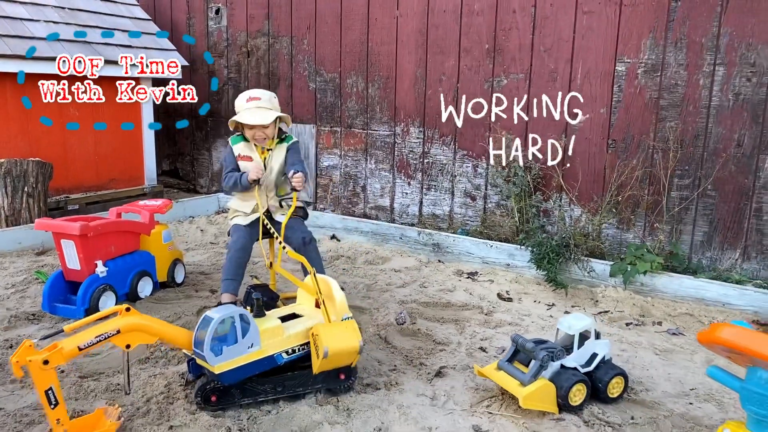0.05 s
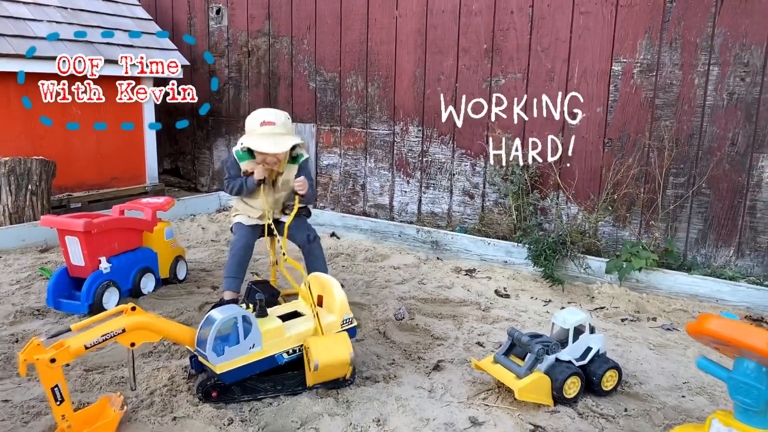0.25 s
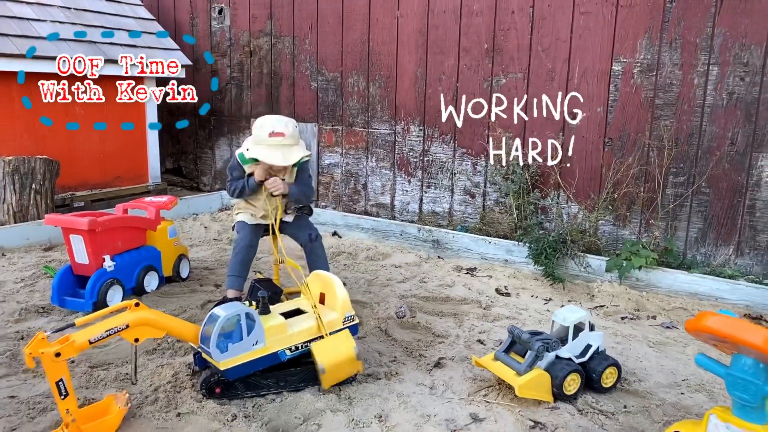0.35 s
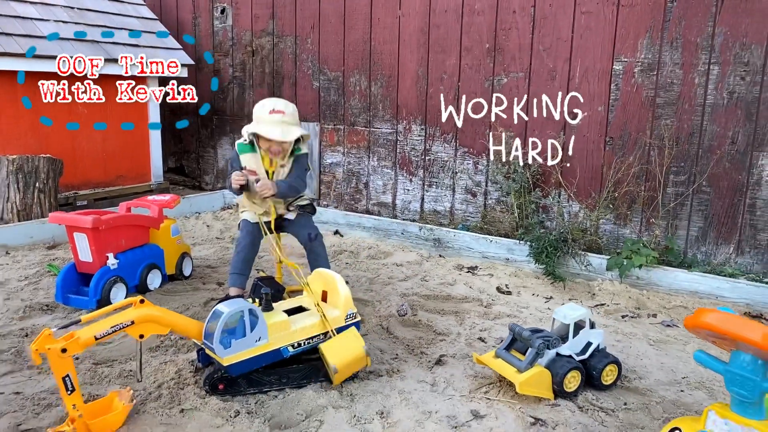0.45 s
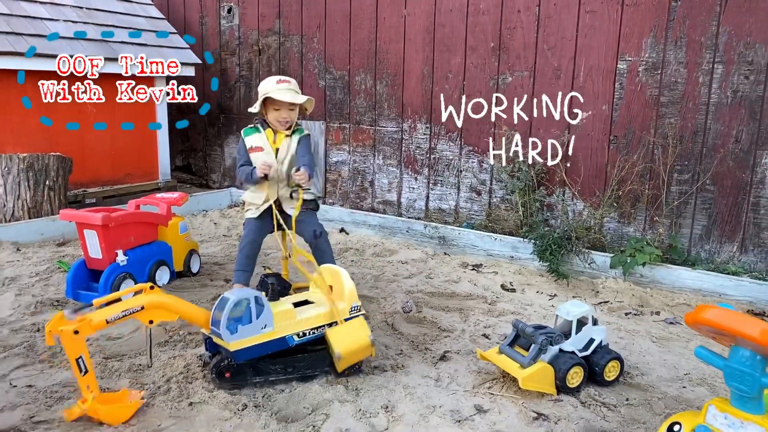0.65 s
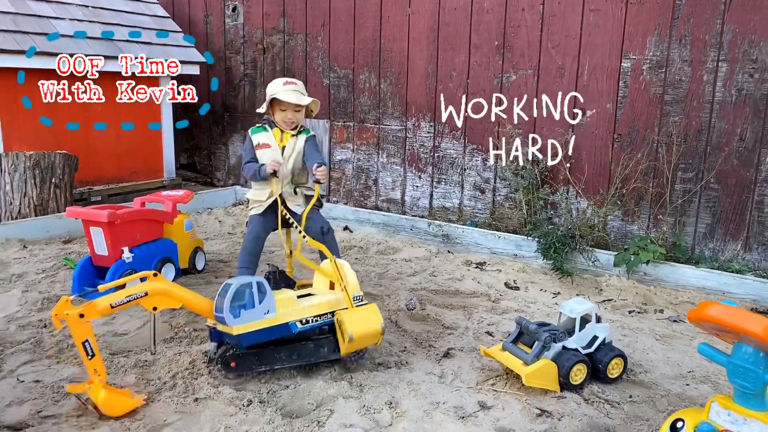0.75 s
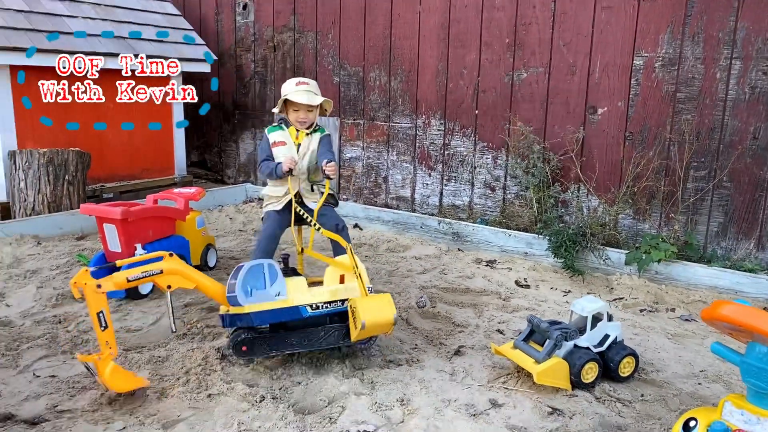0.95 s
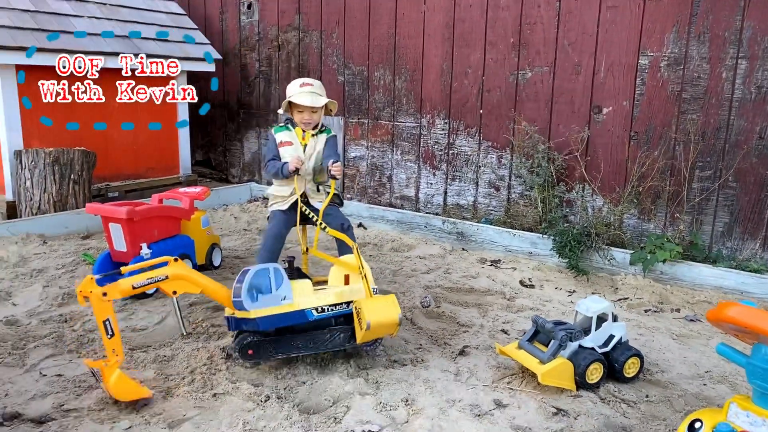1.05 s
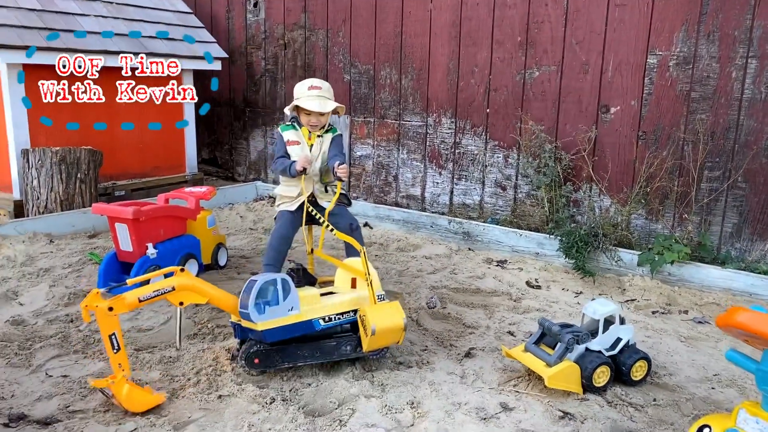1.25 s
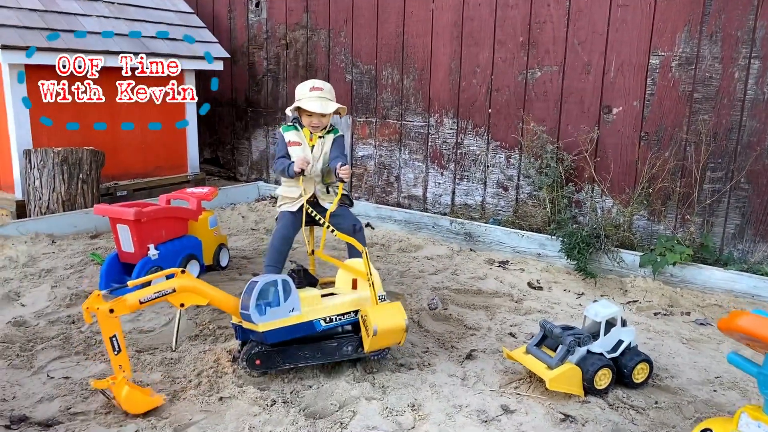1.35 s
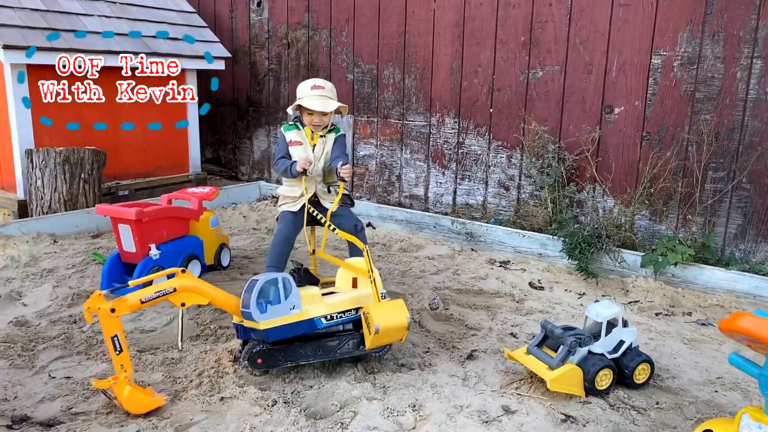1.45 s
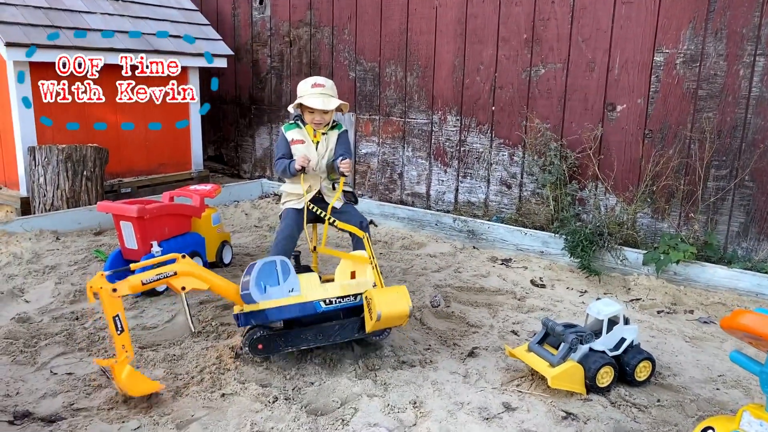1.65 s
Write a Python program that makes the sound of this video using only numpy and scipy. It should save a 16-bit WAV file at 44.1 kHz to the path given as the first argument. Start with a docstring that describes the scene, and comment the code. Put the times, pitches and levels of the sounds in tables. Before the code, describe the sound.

A ride-on toy digger clatters outdoors: a quick run of loose clacks, hollow knocks and gritty scrapes, one loudest double clank, then sparse light ticks and a tiny squeak over low wind, close single microphone.

```python
"""Ride-on toy digger in a sandbox

A child-size digger is worked by its hand levers beside a wooden fence, heard by one microphone under low wind.
Loose joints clack as noise bursts on a plastic shell and ringing steel modes; the seat rumbles as it swivels.
Gritty pivots scrape as trains of random slips, and the hollow body knocks as short swelling sines.
Lighter rattles follow, with two brief squeaks of wavering pitch and one steel ping.
A few dull echoes and a faint tail place the digger in a yard."""
import sys
import numpy as np
from scipy import signal
from scipy.fft import rfft, irfft
from scipy.io import wavfile
from scipy.ndimage import uniform_filter1d

SR = 44100
rng = np.random.default_rng(int(sys.argv[2]) if len(sys.argv) > 2 else 0)


def file_out(sig):
    """Save sig as 16-bit WAV at sys.argv[1]."""
    # one column per channel
    cols = np.atleast_2d(sig).T
    # limit, then scale
    lim = np.clip(cols, -1, 1)
    pcm = np.round(lim * 32767).astype(np.int16)
    wavfile.write(sys.argv[1], SR, pcm)


N = 74970
T = np.arange(N) / SR   # time [s]

# Low wind rumble. Each row: frequency in Hz, relative density in dB per Hz.
WIND_SPECTRUM = [(25, -25.5), (38, -15.5), (50, -3), (69, 7), (82, -2), (97, 6), (125, -7.5), (185, -9.5),
                 (260, -18), (400, -36.5)]
# Level of the low rumble over time. Each row: time in seconds, level around the wind's base level in dB.
RUMBLE_LEVEL = [(0, -0.5), (.2, 0.5), (.3, 1.5), (.41, 3), (.48, -3.5), (.66, 2.5), (.79, -10.5),
                (.86, -4.5), (1.0, -1.5), (1.22, 2), (1.42, -2), (1.5, 2), (1.68, -2.5)]
# Outdoor hush. Each row: frequency in Hz, relative density in dB per Hz.
AIR_SPECTRUM = [(250, -12.5), (450, -9), (750, -6.5), (1200, -16), (1800, -26.5), (2600, -30), (4200, -33),
                (6500, -34), (9000, -42), (16000, -46)]
# Loose joints strike. Each row: start in seconds, drive of the frame in dB, shell clack in dB, grit in dB,
# decay time constant in seconds, pitch of the struck part in Hz, level of the struck part in dB.
CLACKS = [(.003, -36.5, -40, -61, 0.0072, 1574, -35), (.020, -41, -45, -63, 0.015, 1214, -44.5),
          (0.182, -73, -47, -70, 0.0033, 1190, -39.5), (.2285, -20.5, -22.5, -23.5, 0.011, 1700, -47),
          (.251, -15.5, -27, -67, 0.0037, 556, -10.5), (.2765, -52, -34, -23.5, 0.0012, 6540, -29),
          (.2932, -14, -24.5, -28.5, 0.015, 2450, -21), (.339, -19, -24, -36, .007, 1050, -44),
          (.3475, -15.5, -20, -22, 0.0076, 3190, -22.5), (.377, -35, -22.5, -27.5, 0.015, 1700, -18),
          (.403, -56, -20.5, -22.5, 0.0026, 7000, -18.5), (.431, -52, -27, -43, 0.011, 1800, -32),
          (.4742, -35, -18.5, -34, 0.01, 1540, -23), (.501, -26.5, -42, -66, 0.0055, 1770, -26),
          (.593, -37, -40, -35, 0.0058, 479, -22.5), (.6135, -64, -26.5, -37, 0.0095, 1600, -50),
          (.628, -57, -53, -36, 0.0068, 13000, -39), (0.6446, -64, -30, -46, 0.0071, 567, -18),
          (.6748, -43, -22, -33.5, 0.0048, 1820, -20.5), (0.7026, -20.5, -6.5, -28, 0.0077, 2620, -18),
          (.7068, -54, -46, -44, 0.0051, 1890, -10), (.727, -17.5, -11, -24, 0.004, 2530, -16),
          (.733, -24, -57, -32.5, 0.01, 7060, -31), (.798, -58, -46, -45, 0.0033, 4330, -32.5),
          (0.806, -63, -43, -47, 0.01, 3200, -43), (.850, -52, -54, -52, 0.0066, 4000, -38.5),
          (.865, -69, -33, -40.5, 0.0083, 1075, -38), (.925, -72, -44.5, -60, 0.024, 2340, -54),
          (1.155, -49, -58, -53, 0.011, 2270, -64), (1.1784, -38, -34, -48, 0.0057, 1256, -37),
          (1.205, -47, -41, -53, 0.0086, 2110, -44), (1.222, -37.5, -37.5, -44.5, 0.009, 1580, -43),
          (1.274, -64, -50, -37.5, 0.0022, 6700, -45), (1.2903, -70, -45, -50, 0.0059, 4860, -35.5),
          (1.350, -46.5, -51, -46.5, 0.0026, 3580, -52), (1.377, -59, -41.5, -67, 0.0042, 1880, -53),
          (1.392, -44.5, -38, -67, 0.0039, 1410, -37.5), (1.415, -49, -65, -60, 0.0035, 11000, -52),
          (1.444, -75, -67, -60.5, 0.0025, 14300, -44), (1.623, -54, -51, -63, 0.0041, 2520, -71),
          (1.6574, -50, -41, -43.5, 0.0021, 2150, -39.5)]
# Steel frame and arm. Each row: mode in Hz, relative level in dB, time to fall 60 dB in seconds.
FRAME_MODES = [(336.7, -15.5, 0.26), (599, -7, 0.1), (740, 1.5, 0.17), (773, -1.5, 0.13),
               (1035.6, -12.5, 0.12), (1580, -13, 0.061), (1612, -11.5, .14), (1730, -21, 0.15),
               (1803, -19.5, .2), (1794, -34, 0.087), (2402, -17, 0.072), (2504, -20, 0.12),
               (3082, -29, 0.21), (4525, -18, 0.065)]
# Plastic shell, a thicket of short modes. Each row: frequency in Hz, relative density in dB per Hz.
SHELL_SPECTRUM = [(200, -27), (330, -4.5), (560, 1), (880, -3.5), (1040, -0.5), (1250, -3), (1700, -2),
                  (2150, -6), (2600, -5.5), (3400, -15), (4200, -19.5), (7000, -23.5), (16000, -55)]
# Sand crushed in the joints. Each row: frequency in Hz, relative density in dB per Hz.
GRIT_SPECTRUM = [(1500, 0), (3200, 1), (4600, 1), (5800, 0.5), (6900, -1), (8500, -3), (12000, -2),
                 (15800, -6.5)]
# The seat turns. Each row: time in seconds, level in dB.
SWIVEL_LEVEL = [(.02, -37), (.10, -48), (.22, -48), (.30, -32), (.39, -27.5), (.455, -35.5), (.50, -23.5),
                (.56, -41), (.64, -36.5), (.71, -37), (.80, -73), (1.12, -58), (1.20, -36.5), (1.31, -51),
                (1.40, -46.5), (1.55, -49.5)]
# Dull colour of the turning seat. Each row: frequency in Hz, relative density in dB per Hz.
SWIVEL_SPECTRUM = [(140, -7.5), (195, -2), (260, -5.5), (325, 5), (385, -7), (450, -3), (600, -10)]
# How hard the pivots scrape. Each row: time in seconds, effort in dB, before the balance of frame, shell and grit.
SCRAPE_EFFORT = [(.195, -65.5), (.225, -35.5), (.26, -40.5), (.285, -38.5), (.36, -30.5), (.41, -30),
                 (.468, -42.5), (.525, -37), (.58, -43.5), (.64, -43), (.695, -37.5), (.75, -43.5),
                 (.775, -54.5), (.95, -65), (1.08, -74.5), (1.22, -54), (1.42, -82), (1.52, -87)]
# The hollow body knocks and rebounds. Each row: start in seconds, pitch in Hz, peak in dB, rise time in seconds.
KNOCKS = [(.2935, 601, -9.5, 0.0022), (.342, 574, -16, .005), (.356, 740.5, -8.5, 0.0081),
          (.3765, 520, -15.5, 0.0022), (0.4775, 533, -2.5, 0.0023), (.484, 453, -22, 0.002),
          (.5053, 570, -9, 0.0024), (.7028, 701, -0.5, 0.0062), (.7285, 768, -5, 0.0042),
          (.742, 758, -12, 0.012), (1.180, 338, -30.5, 0.0028), (1.393, 758, -29, 0.0083),
          (1.415, 753, -36, 0.013)]
# Dry pivots squeak. Each row: start in seconds, mean pitch in Hz, peak in dB, rise time in seconds.
SQUEAKS = [(1.257, 2570, -45, 0.004), (1.423, 15700, -50, 0.0037)]
# Small steel part. Each row: mode in Hz, relative level in dB, time to fall 60 dB in seconds.
PING_MODES = [(2550, -10, 0.13), (3000, -9, 0.086), (3110, -6, 0.083), (4060, -9, 0.088),
              (4960, -1.5, 0.072), (6460, -21, 0.086), (9100, -16, .07)]
# Echoes off sand, fence and shed. Each row: delay in seconds, level in dB before the treble is dulled.
ECHOES = [(.0045, -18), (.027, -18.5)]

WIND_DB, AIR_DB = -30.5, -50
WIND_STEADY = 0.52   # exponent that evens out the rumble's swings: 0 none, 1 all
CHATTER_PER_S, CHATTER_SPREAD_DB = 9000, 3.5
CLACK_ATTACK_S, FRAME_CHATTER_DB = 0.0018, -14.5
SNAP_DB, SNAP_ATTACK_S, SNAP_DECAY_S = -7, .0003, 0.00085   # first contact, on top of the chatter
PART_Q, PART_CHATTER_DB = 34, -2   # sharpness of the struck part; how much the chatter shakes it
OVERTONE_RATIO, OVERTONE_DB = 1.31, -10.5   # the struck part's second mode
GRAIN_Q = 11   # sharpness of each crushed grain's brief ring
SLIPS_PER_S, SLIP_SPREAD_DB = 700, 4
SCRAPE_GRAINS_PER_S, SCRAPE_GRAIN_SPREAD_DB = 3700, 1
SCRAPE_FRAME_DB, SCRAPE_SHELL_DB, SCRAPE_GRIT_DB = 8.5, 1, -11.5   # balance on top of the effort
SQUEAK_WAVER = 0.024   # rms pitch wander, as a fraction of the pitch
PING_S, PING_DB = 1.2905, -39.5   # the level shifts all the ping's modes
YARD_TAIL_DB, YARD_T60_S, YARD_CUT_HZ = -26, 0.34, 5800   # tail level before the treble is dulled
OVERLOAD = .93   # ceiling of the rounded peaks, full scale 1
CUTOFF_HZ = 16050


def from_db(db):
    """Decibels to gain."""
    return 10 ** (np.asarray(db) / 20)


def rms_one(x):
    """Scale to unit rms."""
    return x / np.sqrt(np.mean(x ** 2) + 1e-20)


def level_curve(rows):
    """Gain over time, drawn straight in dB between the rows."""
    return from_db(np.interp(T, *np.transpose(rows)))


def colour(x, spectrum):
    """Give a steady noise a spectrum that falls away beyond its ends; rms 1."""
    hz, db = np.transpose(spectrum)
    f = np.maximum(np.fft.rfftfreq(N, 1 / SR), 1)
    skirt = np.minimum(1, np.minimum(f / hz[0], hz[-1] / f)) ** 4
    gain = from_db(np.interp(np.log(f), np.log(hz), db))
    return rms_one(irfft(rfft(x) * skirt * gain, N))


def grains(per_s, spread_db):
    """Random clicks of uneven size and either sign; rms 1."""
    size_db = spread_db * np.minimum(rng.exponential(1, N), 4)
    signed_sizes = from_db(size_db) * rng.choice([-1, 1], N)
    return rms_one(signed_sizes * (rng.random(N) < per_s / SR))


def ring(force, modes):
    """A unit click sets each mode ringing at its level, with alternating signs."""
    out = np.zeros(N)
    for k, (hz, db, t60) in enumerate(modes):
        r = np.exp(-np.log(1000) / (t60 * SR))   # decay per sample
        w = 2 * np.pi * hz / SR
        mode = signal.lfilter([0, np.sin(w)], [1, -2 * r * np.cos(w), r * r], force + 1e-18)
        out += (-1) ** k * from_db(db) * mode
    return out


def resonate(x, hz, q):
    """One resonance with gain 1 on top."""
    return signal.lfilter(*signal.iirpeak(min(hz, .45 * SR), q, fs=SR), x + 1e-18)


def click(s):
    """A unit click at one moment."""
    return 1. * (np.arange(N) == int(s * SR))


def swell(s, swell_s):
    """An envelope that rises to 1 and is quickly damped."""
    u = np.clip((T - s) / swell_s, 0, 10)
    return u * np.exp((1 - u * u) / 2)


def burst(age, attack_s, decay_s):
    """An exponential rise multiplied by an exponential decay."""
    return (1 - np.exp(-age / attack_s)) * np.exp(-age / decay_s)


def wind():
    """A low rumble of changing level, sinking after the loudest clank and recovering, under a faint hush."""
    rumble = colour(rng.standard_normal(N), WIND_SPECTRUM)
    swings = np.sqrt(uniform_filter1d(rumble ** 2, size=2500))
    steadied = rms_one(rumble / swings ** WIND_STEADY)
    hush = colour(rng.standard_normal(N), AIR_SPECTRUM)
    return from_db(WIND_DB) * level_curve(RUMBLE_LEVEL) * steadied + from_db(AIR_DB) * hush


def sand(per_s, spread_db):
    """Crushed grains, dealt to short resonances across the treble; rms 1."""
    clicks = grains(per_s, spread_db)
    pitches = np.geomspace(2400, 15600, 26)   # Hz
    dealt = rng.integers(0, len(pitches), N)
    rings = sum((-1) ** k * resonate(clicks * (dealt == k), hz, GRAIN_Q) for k, hz in enumerate(pitches))
    return colour(rings, GRIT_SPECTRUM)


def clacks():
    """Each strike snaps, rings the frame and dies in a chatter that shakes part and shell and crushes sand."""
    force, shell, grit, parts = np.zeros((4, N))
    chatter = grains(CHATTER_PER_S, CHATTER_SPREAD_DB)
    for s, ring_db, clack_db, grit_db, decay_s, part_hz, part_db in CLACKS:
        age = np.clip(T - s, 0, .5)
        dying = burst(age, CLACK_ATTACK_S, decay_s)
        size = np.linalg.norm(dying)
        unit_chatter = chatter * dying / size
        force += from_db(ring_db) * (click(s) + from_db(FRAME_CHATTER_DB) * unit_chatter)

        # shell and grit share one loudness shape: a snap on the dying chatter
        shape = dying + from_db(SNAP_DB) * burst(age, SNAP_ATTACK_S, SNAP_DECAY_S)
        shell += from_db(clack_db) * shape
        grit += from_db(grit_db) * shape

        contact = click(s) + from_db(PART_CHATTER_DB) * unit_chatter
        overtone = resonate(contact, part_hz * OVERTONE_RATIO, PART_Q)
        part = resonate(contact, part_hz, PART_Q) + from_db(OVERTONE_DB) * overtone
        parts += from_db(part_db) * size * part / np.linalg.norm(part)
    shell_noise = shell * colour(chatter, SHELL_SPECTRUM)
    grit_noise = grit * sand(CHATTER_PER_S, CHATTER_SPREAD_DB)
    return ring(force, FRAME_MODES) + parts + shell_noise + grit_noise


def swivel():
    """The seat judders round on its base: random slips with a dull colour."""
    judder = grains(SLIPS_PER_S, SLIP_SPREAD_DB)
    return level_curve(SWIVEL_LEVEL) * colour(judder, SWIVEL_SPECTRUM)


def scrape():
    """The pivots stick and slip; slips excite frame and shell while sand is crushed under the same effort."""
    effort = level_curve(SCRAPE_EFFORT)
    slips = grains(SLIPS_PER_S, SLIP_SPREAD_DB)
    # scaled so that slips of steady unit effort would ring the frame at rms 1
    frame = ring(effort * slips, FRAME_MODES) / np.std(ring(slips, FRAME_MODES))
    shell = from_db(SCRAPE_SHELL_DB) * colour(slips, SHELL_SPECTRUM)
    grit = from_db(SCRAPE_GRIT_DB) * sand(SCRAPE_GRAINS_PER_S, SCRAPE_GRAIN_SPREAD_DB)
    return from_db(SCRAPE_FRAME_DB) * frame + effort * (shell + grit)


def knocks():
    """The hollow body booms briefly at one pitch a knock, damped by the rider and the sand."""
    out = np.zeros(N)
    for s, hz, db, swell_s in KNOCKS:
        out += from_db(db) * swell(s, swell_s) * np.sin(2 * np.pi * hz * (T - s))
    return out


def squeaks():
    """Dry pivots give very short friction tones of unsteady pitch."""
    wander = rms_one(uniform_filter1d(rng.standard_normal(N), size=40))
    warped_time = np.cumsum(1 + SQUEAK_WAVER * wander) / SR
    out = np.zeros(N)
    for s, hz, db, swell_s in SQUEAKS:
        out += from_db(db) * swell(s, swell_s) * np.sin(2 * np.pi * hz * warped_time)
    return out


def ping():
    """One light tap sets the modes of a small steel part ringing."""
    return from_db(PING_DB) * ring(click(PING_S), PING_MODES)


def yard(x):
    """Reflected sound alone: a few dull echoes and a faint scattered tail."""
    tail = rng.standard_normal(N) * np.exp(-np.log(1000) * T / YARD_T60_S)
    response = from_db(YARD_TAIL_DB) * tail / np.linalg.norm(tail)
    response += sum(from_db(db) * click(s) for s, db in ECHOES)
    response = signal.lfilter(*signal.butter(1, YARD_CUT_HZ, fs=SR), response)
    return signal.fftconvolve(x, response)[:N]


def scene():
    """The digger, direct and reflected by the yard, with the wind; one channel."""
    digger = clacks() + swivel() + scrape() + knocks() + squeaks() + ping()
    return (digger + yard(digger) + wind())[None]


def record(dry):
    """At the microphone the loudest peaks are rounded off and the top is cut."""
    rounded = dry / (1 + (dry / OVERLOAD) ** 6) ** (1 / 6)
    steep_lowpass = signal.ellip(10, .05, 60, CUTOFF_HZ, fs=SR, output="sos")
    return signal.sosfiltfilt(steep_lowpass, rounded)


dry = scene()
out = record(dry)
file_out(out)
```